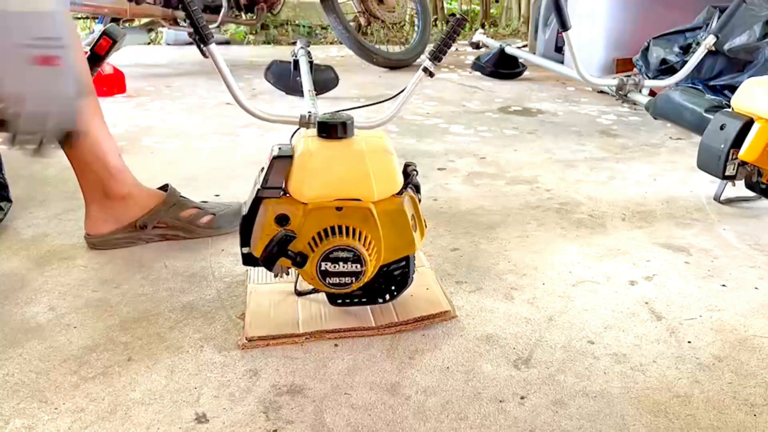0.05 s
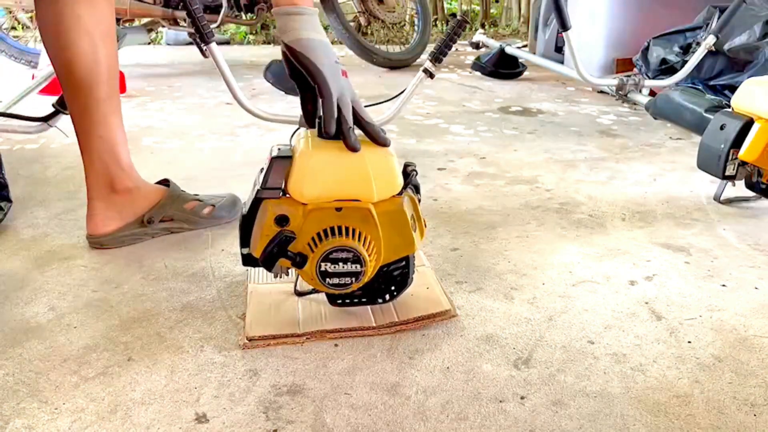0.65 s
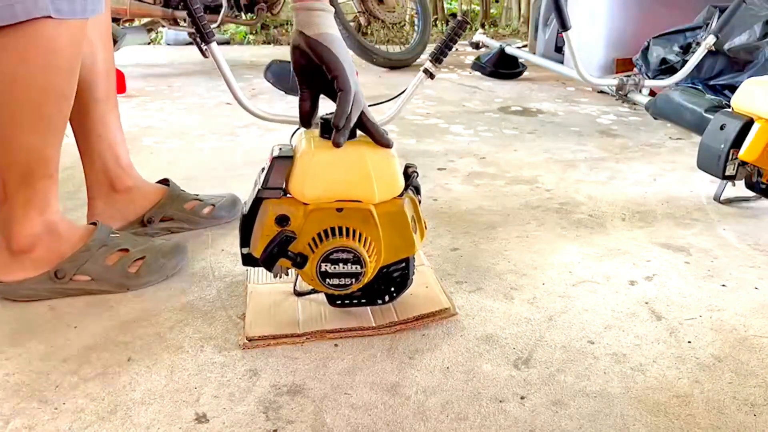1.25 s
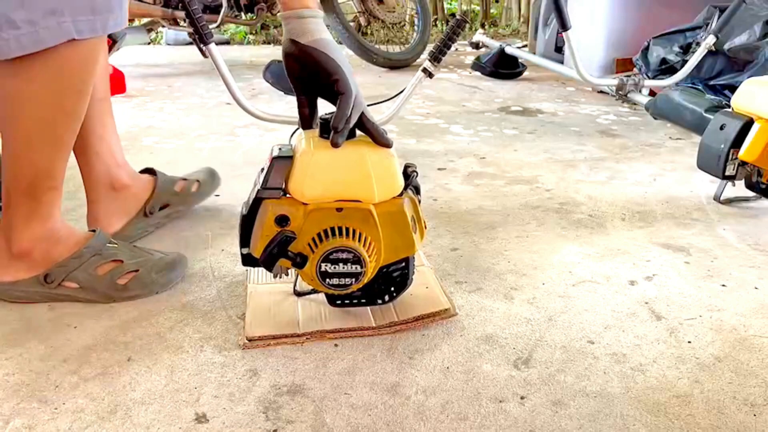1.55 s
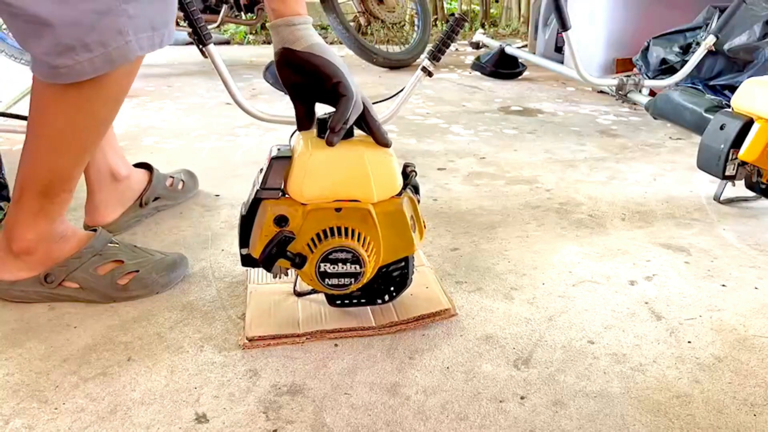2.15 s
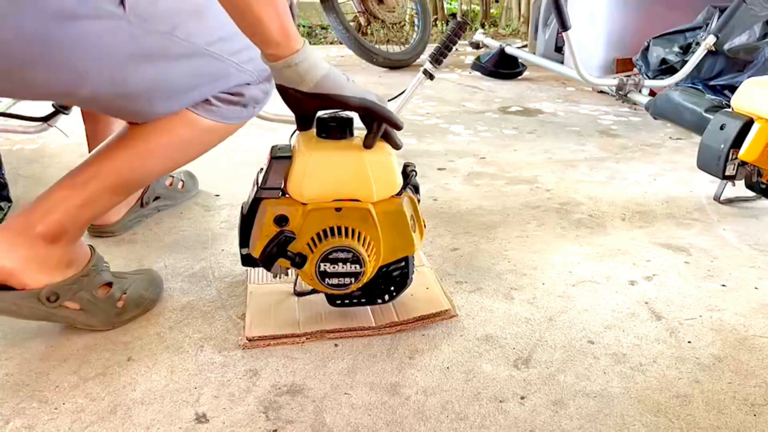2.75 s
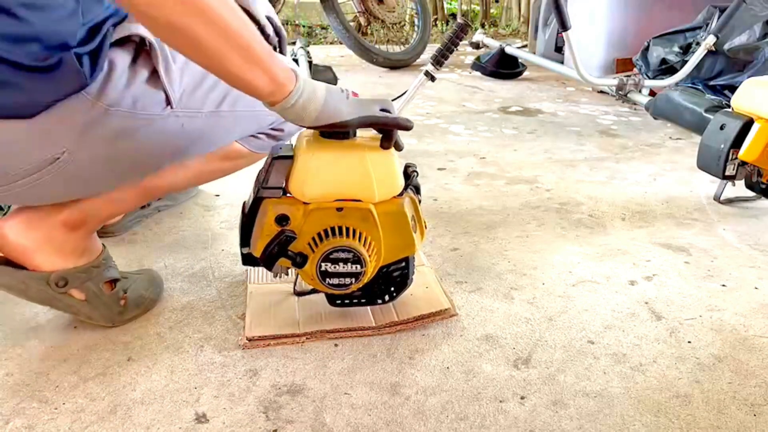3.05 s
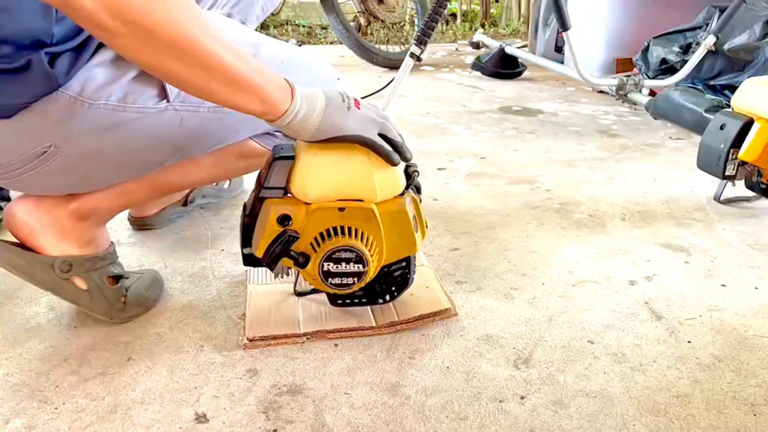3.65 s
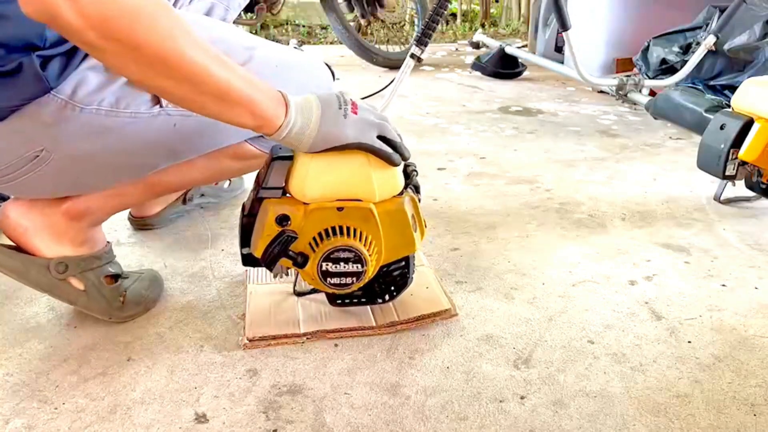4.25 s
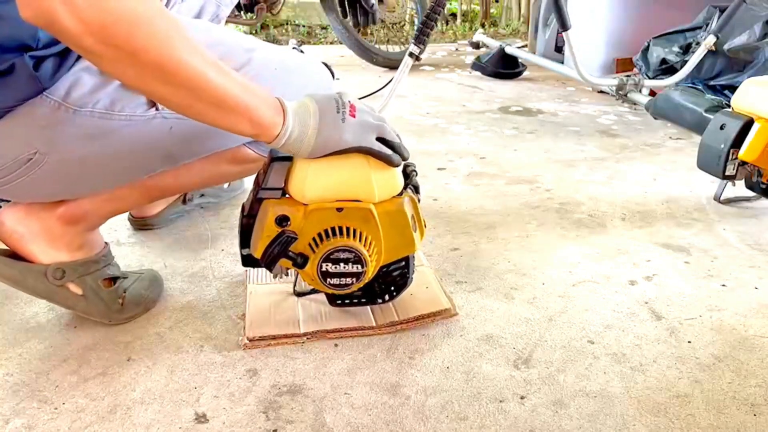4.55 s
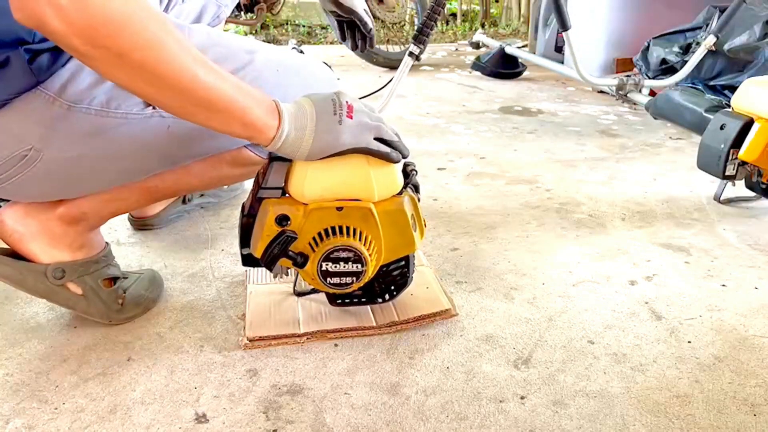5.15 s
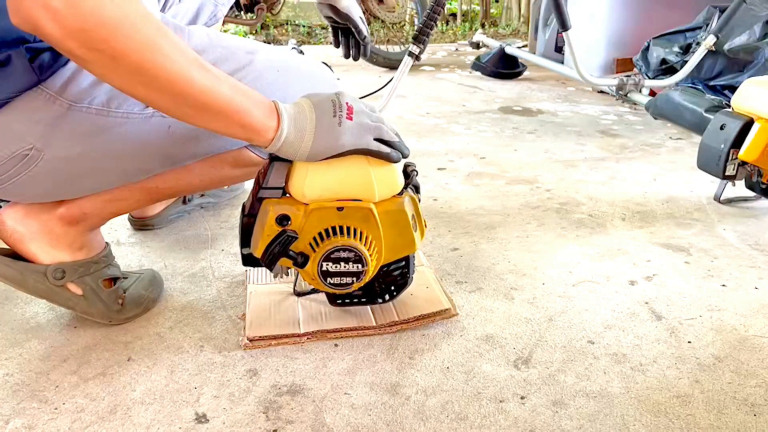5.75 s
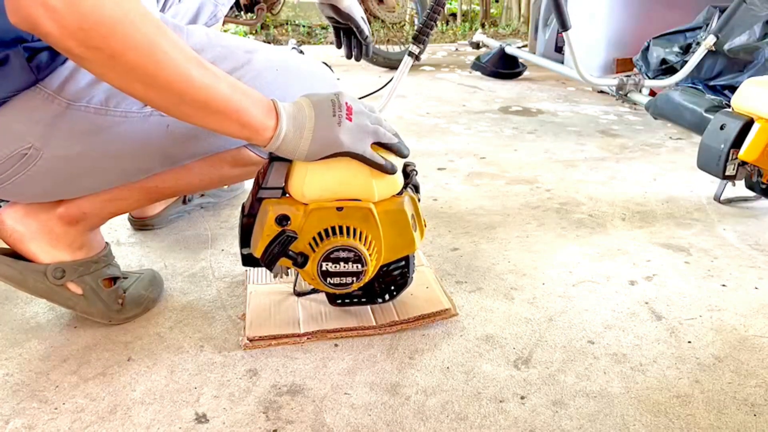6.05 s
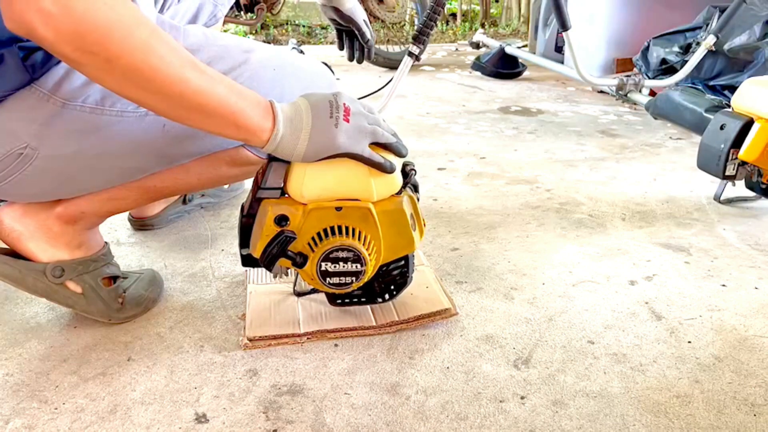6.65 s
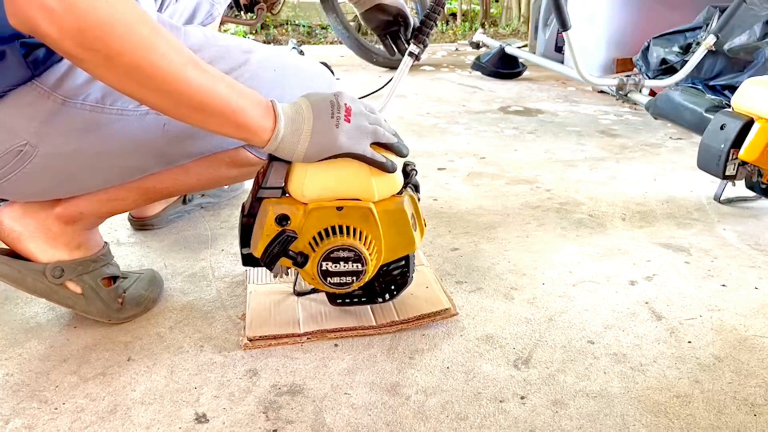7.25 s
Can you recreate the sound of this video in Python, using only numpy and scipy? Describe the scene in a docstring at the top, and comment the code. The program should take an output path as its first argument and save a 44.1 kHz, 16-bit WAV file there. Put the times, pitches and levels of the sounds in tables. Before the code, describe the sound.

A small two-stroke brushcutter engine idles close to the microphone in an open workshop. It pops unevenly, some firings thumping hollowly and others barking sharply, with dull puffs and faint sputters between them. The casing rattles and the muffler pings over a steady fan whirr. About three seconds in, the fuel tank's boxy tone is slightly damped, and the idle carries on at the same pace.

```python
"""An open workshop: a small two-stroke brushcutter idles close by on the concrete floor.
It fires mostly every third or fourth turn, a sharp pop that sweeps down through the muffler and rings
the casing. A slow burn thumps hollowly, a fast one barks, and some make the muffler shell ping.
The turns between give dull puffs and the odd sputter over the whirr of fan and gears; the walls throw
the pops back. Near 3 s a hand presses on the tank, damping its boom and shifting the ping."""
import sys
import numpy as np
from scipy import signal
from scipy.fft import rfft, irfft, next_fast_len
from scipy.io import wavfile
from scipy.ndimage import uniform_filter1d

SR = 44100
rng = np.random.default_rng(int(sys.argv[2]) if len(sys.argv) > 2 else 0)


def unload_audio(sound):
    """Save the sound as a 16-bit wav file, at the path given as the first command line argument."""
    columns = np.transpose(np.atleast_2d(sound))
    # keep every value between -1 and 1, then stretch to whole-number steps
    steps = np.round(np.clip(columns, -1, 1) * 32767)
    wavfile.write(sys.argv[1], SR, steps.astype(np.int16))


N = 326340
TURN_S = .0256  # one turn of the crank

# the clear pops: start_s, thump_db, steepness (0 slow burn, about 1 fast), crack_db, ping_db
FIRINGS = [(0.0319, 2.4, 0.32, 6.0, 6.0), (0.1271, -1.1, 0.64, 3.0, 10.0), (0.1998, 1.0, 0.77, 3.0, 2.0),
           (0.2701, -4.3, 0.07, -24.0, -6.0), (0.2948, -0.8, 0.26, -11.0, -10.0),
           (0.345, 4.4, 0.65, 2.0, 7.0), (0.4178, -0.7, 1.03, 0.0, 0.0), (0.4897, -3.4, 0.27, -20.0, -5.0),
           (0.5151, 4.2, 0.0, 2.0, 12.0), (0.5927, 2.7, 0.63, 1.0, 8.0), (0.6744, 3.2, 0.0, -1.0, 13.0),
           (0.756, 1.3, 0.28, -1.0, -9.0), (0.8368, 3.8, 0.2, -1.0, 13.0), (0.9206, 0.4, 0.92, 2.0, 13.0),
           (1.0169, -2.6, 0.11, -10.0, 0.0), (1.0426, -0.5, 0.32, -9.0, 1.0),
           (1.1234, 2.4, 0.63, 1.0, 10.0), (1.2049, 1.4, 0.8, 2.0, 15.0),
           (1.2817, -4.9, 0.32, -17.0, -14.0), (1.3082, 3.6, 0.23, 4.0, 6.0), (1.411, 3.4, 0.89, 5.0, 10.0),
           (1.5328, -1.0, 0.91, 1.0, 4.0), (1.6327, 0.6, 0.82, 2.0, 1.0), (1.7083, -0.5, 0.25, -6.0, -5.0),
           (1.7338, -3.6, 0.43, -19.0, -7.0), (1.7864, 4.4, 0.11, 2.0, 5.0), (1.8682, 0.9, 0.62, 2.0, 9.0),
           (1.9483, 3.6, 0.0, -1.0, 13.0), (2.0022, -3.4, 0.0, -21.0, -8.0), (2.0271, 1.8, 0.0, -3.0, 4.0),
           (2.1141, 0.1, 0.82, -1.0, 0.0), (2.2138, 2.5, 0.81, 1.0, 12.0), (2.2902, 0.5, 0.91, 6.0, -11.0),
           (2.3893, -0.2, 0.97, 2.0, -11.0), (2.4821, 3.2, 0.67, -1.0, 6.0), (2.554, 0.5, 0.2, -6.0, 6.0),
           (2.578, 3.1, 0.4, -1.0, 2.0), (2.6766, -1.1, 0.8, 3.0, -9.0), (2.7693, 2.0, 0.0, -3.0, 8.0),
           (2.7937, -4.6, 0.36, -18.0, -5.0), (2.871, 2.0, 0.12, -2.0, -4.0),
           (2.9514, 2.7, 0.77, 3.0, -5.0), (3.0505, 1.6, 0.89, 4.0, 8.0), (3.1502, 0.1, 1.01, 2.0, 6.0),
           (3.2259, 3.8, 0.27, 4.0, 2.0), (3.3059, 3.8, 0.5, 3.0, 2.0), (3.407, 3.4, 0.81, 5.0, 3.0),
           (3.4842, 4.9, 0.67, 7.0, -10.0), (3.5607, 0.2, 1.13, 3.0, -6.0), (3.661, 4.0, 0.76, 5.0, 6.0),
           (3.7822, 5.1, 0.37, 5.0, 7.0), (3.9008, 4.1, 0.64, 3.0, 5.0), (3.997, 1.6, 0.78, 3.0, 0.0),
           (4.0727, 2.3, 0.88, 4.0, 6.0), (4.173, 3.3, 0.58, 7.0, -7.0), (4.2704, 4.4, 0.77, 3.0, 0.0),
           (4.3451, -4.9, 0.24, -21.0, -17.0), (4.3716, 2.2, 0.28, 0.0, 5.0), (4.452, 1.2, 0.01, -2.0, 0.0),
           (4.5364, 4.9, 0.13, 2.0, -14.0), (4.6202, 1.6, 0.96, 5.0, -13.0), (4.7025, 1.9, 0.98, 0.0, 6.0),
           (4.7829, -1.0, 1.05, 0.0, 6.0), (4.8811, 1.0, 0.89, 2.0, -8.0), (4.9777, -1.0, 0.94, 5.0, 3.0),
           (5.0731, 5.6, 0.51, 6.0, -6.0), (5.1711, 2.5, 0.68, 3.0, -9.0), (5.2904, 3.7, 0.38, 5.0, -9.0),
           (5.3813, -2.4, 0.0, -20.0, -20.0), (5.4325, 1.1, 0.8, 6.0, 12.0),
           (5.5293, -0.9, 0.82, 0.0, -7.0), (5.609, 2.0, 0.6, 3.0, 8.0), (5.6889, 0.7, 0.97, 3.0, -6.0),
           (5.7655, -5.2, 0.14, -22.0, -1.0), (5.7925, 3.1, 0.72, 2.0, -3.0),
           (5.8889, 1.5, 0.32, -4.0, 7.0), (5.9136, 1.1, 0.2, -5.0, -9.0),
           (5.9887, -2.5, 0.17, -14.0, -2.0), (6.0147, 0.7, 0.24, -1.0, 9.0),
           (6.0932, 2.2, 0.04, -2.0, -14.0), (6.176, 1.1, 0.39, -7.0, -4.0),
           (6.2626, 3.6, 0.13, 0.0, -13.0), (6.3512, 1.8, 0.97, 6.0, -3.0), (6.4357, 1.3, 1.14, 3.0, -13.0),
           (6.5426, 1.2, 0.97, 2.0, 2.0), (6.643, 4.1, 0.18, 6.0, 0.0), (6.7367, 0.1, 0.12, -12.0, 3.0),
           (6.7613, 1.8, 0.76, 4.0, 3.0), (6.8545, 4.4, 0.64, 3.0, -10.0), (6.9247, -0.2, 0.15, -4.0, -1.0),
           (6.9482, -5.0, 0.19, -23.0, -10.0), (6.9725, -0.3, 0.3, -6.0, -6.0),
           (7.0466, 2.2, 0.7, 3.0, -6.0), (7.1421, -0.6, 0.87, 1.0, -8.0), (7.235, 1.7, 1.01, 1.0, 0.0),
           (7.3305, 0.9, 0.72, 2.0, -2.0)]


def gain_of(db):
    """Decibels to gain."""
    return 10 ** (np.asarray(db) / 20)


def unit_rms(x):
    """Scales a sound to rms 1."""
    return x / np.sqrt(np.mean(x ** 2) + 1e-20)


def curve_at(points, hz):
    """Reads a curve on a log-frequency axis."""
    freq_hz, value = np.transpose(points)
    return np.interp(np.log(hz + 1), np.log(freq_hz + 1), value)


def add(mix, start_s, sound):
    """Mixes a sound in at start_s."""
    part = mix[max(round(start_s * SR), 0):][:len(sound)]
    part += sound[:len(part)]


def filtered(x, response):
    """Applies a response, given as a function of frequency."""
    size = next_fast_len(x.shape[-1] + 4096)
    return irfft(rfft(x, size) * response(np.fft.rfftfreq(size, 1 / SR)), size)[..., :x.shape[-1]]


def coloured(x, eq):
    """Equalises a sound with a curve of freq_hz, level_db."""
    return filtered(x, lambda hz: gain_of(curve_at(eq, hz)))


def resonances(x, modes):
    """What a set of resonances gives back when a sound drives it."""
    return filtered(x, lambda hz: sum(gain_of(db) / (1 + 2j * (hz - pitch_hz) / width_hz)
                                      for pitch_hz, width_hz, db in modes))


def spread(pair):
    """Two unrelated signals become a diffuse field, centred in the bass and wide above."""
    # stereo image of the room: freq_hz, left_right_likeness
    likeness = [(60, 0.99), (300, 0.99), (700, 0.19), (1500, 0.45), (4000, 0.39), (15000, 0.23)]
    mid = filtered(pair[0], lambda hz: np.sqrt((1 + curve_at(likeness, hz)) / 2))
    side = filtered(pair[1], lambda hz: np.sqrt((1 - curve_at(likeness, hz)) / 2))
    return np.array([mid + side, mid - side])


def unfired_turns(jitter_s=.00012):
    """Times of the turns between firings: a burn kicks the crank, which slows as it coasts."""
    # coasting crank: port_lag_s, slowing, extra_slowing_after_fast_burn, fast_burn_lead_s
    coast = (.00333, .166, .0376, .00088)
    port_s, slowing, kick, lead_s = coast
    fired = [(row[0], row[2]) for row in FIRINGS]
    fired = [(fired[0][0] - 3 * TURN_S, .5), *fired, (fired[-1][0] + 4 * TURN_S, .5)]
    times = []
    for (start, steep), (end, next_steep) in zip(fired, fired[1:]):
        count = max(round((end - start) / TURN_S), 1)
        share = np.arange(1, count) / count
        coasted = share - (slowing + kick * steep) * share * (1 - share)
        times += list(start + port_s + (end - start) * coasted + lead_s * next_steep * share)
    times = times + jitter_s * rng.standard_normal(len(times))
    return np.array([s for s in times if 0 < s < N / SR])


def burns(turns, wait_s=.062, chance=.15, scatter_db=6.5):
    """The firings plus faint sputters, where the charge half catches after a few unfired turns."""
    # a typical sputter: thump_db, steepness, crack_db, ping_db
    sputter = (-11.5, 0.04, -27, -18)
    fired = np.array(FIRINGS, float)
    last_firing_s = np.append(0, fired[:, 0])[np.searchsorted(fired[:, 0], turns)]
    caught = (turns - last_firing_s > wait_s) & (rng.random(len(turns)) < chance)
    offset_db = scatter_db * rng.standard_normal(len(turns))
    sputters = np.add(sputter, np.outer(offset_db, [1, 0, 1, 1]))
    return np.vstack([fired, np.column_stack([turns, sputters])[caught]]).T


def whirr(turns, level_db=-30, throb=0.014):
    """A bed of fan and gear noise that swells very slightly once a turn."""
    # fan, gears and intake: freq_hz, level_db
    whirr_eq = [(20, -7), (60, -4), (140, 15), (300, 10), (600, -0.5), (1000, -8.5), (1400, -4.5),
                (1900, -8), (2600, -7), (3600, -6.5), (5300, -10.5), (6900, -13), (9900, -24), (12000, -13),
                (15500, -41)]
    every_turn = np.sort([*turns, *(row[0] for row in FIRINGS)])
    crank = np.interp(np.arange(N) / SR, every_turn, np.arange(len(every_turn)))
    air = unit_rms(coloured(spread(rng.standard_normal((2, N))), whirr_eq))
    return gain_of(level_db) * air * (1 + throb * np.cos(2 * np.pi * (crank - .2)))


def muffler(pulse_db, hz, cycles, corner_hz, lag_s=0):
    """Low notes leave the muffler later than high ones, so each pulse sweeps downward."""
    delay_cycles = cycles * np.log(1 + hz / corner_hz) + np.cumsum(lag_s * np.gradient(hz))
    return irfft(gain_of(pulse_db) * np.exp(-2j * np.pi * delay_cycles))


def puffs(turns, burn_times, scatter_db=0.4):
    """A turn with no burn sucks gently back as the exhaust port opens: a soft, dull puff."""
    # exhaust pulse of an unfired turn: freq_hz, level_db
    spectrum = [(35, -12), (46, 22), (58, 23.5), (82, 33), (115, 22.5), (175, 31.5), (290, 23.5), (420, 17),
                (600, 9), (900, -13), (2000, 0), (6000, -55)]
    # its downward sweep: delay_cycles, corner_hz, lead_s
    sweep = (3.8, 107, .007)
    cycles, corner_hz, lead_s = sweep
    out, hz = np.zeros(N), np.fft.rfftfreq(4096, 1 / SR)
    puff = -muffler(curve_at(spectrum, hz), hz, cycles, corner_hz)
    for start, db in zip(turns, scatter_db * rng.standard_normal(len(turns))):
        if start not in burn_times:
            add(out, start - lead_s, gain_of(db) * puff)
    return out


def pops(times, thumps_db, steepness, cracks_db, rasp_share=0.33):
    """Each burn blows out through the muffler: a hollow thump if slow, a bark if fast."""
    # exhaust pulse of a burn: freq_hz, slow_db, fast_db
    spectra = [(35, 10, 8), (56.4, 22, 32.5), (88, 27, 27.5), (157, 26.5, 23.5), (276, 29.5, 30.5),
               (432, 27, 27.5), (560, 21, 20), (617, 25.5, 18), (837, 10, 16), (876, 10.5, 26.5),
               (1134, 0.5, 23), (1414, -16, 11), (1830, 10.5, 18.5), (1984, 0, 11), (2600, -17, -2.5),
               (6000, -24, -36)]
    # its downward sweep: delay_cycles, corner_hz, lead_s
    sweep = (1.41, 27, .0004)
    # the mids take a short cut past the baffles, the bark comes late: freq_hz, extra_delay_s
    baffle_lag = [(480, 0), (540, -.0011), (830, -.0011), (900, 0), (1150, .0002), (1250, .0009),
                  (2500, .0008)]
    # air booming on in the muffler chamber: pitch_hz, width_hz, level_db
    chamber = [(96, 28, 3.5)]
    cycles, corner_hz, lead_s = sweep
    out, hz = np.zeros(N), np.fft.rfftfreq(4096, 1 / SR)
    for start, thump_db, steep, crack_db in zip(times, thumps_db, steepness, cracks_db):
        pulse_db = curve_at([(f, slow + steep * (fast - slow)) for f, slow, fast in spectra], hz)
        force_db = curve_at([(1250, thump_db), (1600, rasp_share * crack_db)], hz)  # top follows the jet
        pop = muffler(pulse_db + force_db, hz, cycles, corner_hz, curve_at(baffle_lag, hz))
        add(out, start - lead_s, pop)
    return out + resonances(out, chamber)


def bursts(times, levels_db, rise_s, fall_s):
    """Short gusts of noise with a quick attack and an exponential decay."""
    t, flow = np.arange(SR // 20) / SR, np.zeros(N)
    envelope = (1 - np.exp(-(t / rise_s) ** 2)) * np.exp(-t / fall_s)
    for start, db in zip(times, levels_db):
        add(flow, start, gain_of(db) * envelope / envelope.max())
    return flow * rng.standard_normal(N)


def crack(times, crack_db, level_db=-29.5, lead_s=0.0001):
    """A turbulent jet of hot gas puts a crack on the front of each pop."""
    # the jet at the outlet: freq_hz, level_db
    jet_eq = [(200, -3), (600, -3.5), (1000, -3), (1450, -2), (1900, -0.5), (2500, -12), (3800, -2),
              (4700, -6), (5400, -11.5), (6500, -9.5), (10000, -11), (12400, -1.5), (13800, -6.5),
              (14800, -13), (16500, -36)]
    jet = bursts(times - lead_s, crack_db, rise_s=0.0012, fall_s=0.0023)
    return gain_of(level_db) * unit_rms(coloured(jet, jet_eq))


def knocks(times, levels_db):
    """Single sharp blows, one sample each."""
    return np.bincount(np.round(np.maximum(times, 0) * SR).astype(int), gain_of(levels_db), N)[:N]


def ringing(force, hz, db, t60_s, spread_radians):
    """One struck metal mode, radiating with its own phase to left and right."""
    t = np.arange(SR // 10) / SR
    phase = 2 * np.pi * rng.random() + spread_radians * rng.standard_normal((2, 1))
    ring = gain_of(db - 60 * t / t60_s) * np.sin(2 * np.pi * hz * t + phase)
    return signal.oaconvolve(force[None], ring, axes=1)[:, :N]


def hand_db():
    """How freely the tank rings under the hand, sample by sample."""
    # the hand presses, then eases a little: time_s, level_db
    damping = [(0, -5.5), (2.5, -6.5), (3.1, -17), (7.4, -12)]
    return np.interp(np.arange(N) / SR, *np.transpose(damping))


def casing(times, crack_db, turns, level_db=-37.5, scatter_db=4, hand_share=0.38, rattles=600):
    """Burns knock the casing, the piston slaps it, loose covers rattle; the hand calms it a little."""
    # crankcase, cylinder fins and covers: pitch_hz, level_db, t60_s
    modes = [(918, -2.5, 0.083), (1120, -1, 0.026), (1677, 1, 0.085), (1853, -2, 0.012), (1996, 3, 0.048),
             (2237, 3.5, 0.031), (2715, -11, 0.024), (2960, -8, 0.097), (3170, 6, 0.027),
             (3420, 3.5, 0.025), (3600, 5.5, 0.02), (4700, -9.5, 0.034), (6160, 0, 0.012)]
    knock_db = -5 + 0.71 * crack_db
    slap_db = np.full(len(turns), -5)
    rattle_db = np.full(rattles, -11)
    hits_db = np.concatenate([knock_db, slap_db, rattle_db])
    out = np.zeros((2, N))
    for mode in modes:
        hits_s = np.concatenate([times, turns, rng.uniform(0, N / SR, rattles)])
        force = knocks(hits_s, hits_db + scatter_db * rng.uniform(-1, 1, len(hits_s)))
        out += ringing(force, *mode, spread_radians=0.84)
    return gain_of(level_db) * unit_rms(out * gain_of(hand_share * hand_db()))


def clink(times, crack_db, ping_db, turns, level_db=-39, chatter_db=-28, tick_db=-10, delay_s=0.001394):
    """Each pressure front strikes the muffler shell, which chatters on its bolts and ticks between."""
    # thin metal shell of the muffler: pitch_hz, level_db, t60_s
    modes = [(3489, 0.5, .035), (3544, 1.5, .04), (3764, 1, 0.037), (4080, -4, 0.013), (4380, -4, 0.014)]
    blow_db = 0.91 * crack_db + 0.11 * ping_db
    blows = knocks(times + delay_s, blow_db)
    chatter = bursts(times, blow_db + chatter_db, rise_s=0.0017, fall_s=0.005)
    ticks = knocks(turns, tick_db + rng.uniform(-3, 3, len(turns)))
    shell = sum(ringing(blows + chatter + ticks, *mode, spread_radians=0.41) for mode in modes)
    return gain_of(level_db) * unit_rms(shell)


def ping(times, ping_db, level_db=-41, t60_s=0.054, rise_s=0.0022, scatter_hz=8):
    """One mode of the muffler shell rings out clearly after some pops."""
    # the note of the shell, rising as the hand presses: time_s, pitch_hz
    pitch_curve = [(0, 3920), (.85, 3888), (1.2, 3915), (2.9, 3912), (3.6, 3965), (5.6, 3992), (6, 3925),
                   (7.4, 3950)]
    t, out = np.arange(SR // 8) / SR, np.zeros(N)
    for start, db, (detune, phase) in zip(times, ping_db, rng.standard_normal((len(times), 2))):
        hz = np.interp(start, *np.transpose(pitch_curve)) + scatter_hz * detune
        envelope = gain_of(db - 60 * t / t60_s) * (1 - np.exp(-t / rise_s))
        add(out, start, envelope * np.sin(2 * np.pi * (hz * t + phase)))
    return gain_of(level_db) * unit_rms(out)


def tank(shake):
    """The plastic fuel tank, shaken by the exhaust, adds boxy tones that the hand damps."""
    # tank resonances: pitch_hz, width_hz, level_db
    modes = [(414.6, 8, 5.5), (636, 76, 3.5), (1915, 41, 8)]
    return resonances(shake, modes) * gain_of(hand_db())


def diffuse_tail(build_s=0.0011):
    """The room's reverb: a noise tail that dies sooner in the treble."""
    # decay of the room: freq_hz, t60_s
    decay_times = [(100, 0.62), (500, 0.26), (2000, 0.25), (6000, 0.2), (14000, 0.13)]
    # tone of the tail: freq_hz, level_db
    tail_eq = [(60, -3), (300, -3), (900, 1), (3500, 7.5), (7000, 4.5), (13000, 1.5)]
    hz, t, noise = signal.stft(spread(rng.standard_normal((2, SR // 2))), SR, nperseg=256)
    envelope = gain_of(-60 * t / curve_at(decay_times, hz)[:, None]) * (1 - np.exp(-(t / build_s) ** 2))
    tail = signal.istft(noise * envelope, SR)[1]
    return coloured(tail / np.linalg.norm(tail[0]), tail_eq)


def workshop(x, tail_db=-11, tails=5):
    """Distinct reflections, then a short, smooth reverb tail, picked at random for each pop."""
    # nearby walls and roof: delay_s, gain
    echoes = [(0.0126, -0.16), (0.036, 0.039)]
    early, late = np.zeros(N), np.zeros((2, N))
    for delay_s, gain in echoes:
        add(early, delay_s, gain * x)
    early = coloured(early, [(600, 1.0), (3000, -8), (12000, -17)])  # cluttered walls scatter the treble
    switch_s = [row[0] - TURN_S / 10 for row in FIRINGS]  # just before each firing
    picks = rng.integers(0, tails, len(FIRINGS) + 1)
    active_tail = picks[np.searchsorted(switch_s, np.arange(N) / SR)]
    for k in range(tails):
        send = uniform_filter1d(1. * (active_tail == k), size=128)
        late += signal.oaconvolve((x * send)[None], diffuse_tail(), axes=1)[:, :N]
    return early + gain_of(tail_db) * late


def standing_waves(exhaust):
    """The exhaust sets the air humming between floor and roof."""
    # room modes: pitch_hz, width_hz, level_db
    modes = [(147.7, 19, -4.5), (215, 24, -14.5), (259, 8.4, -13.5), (332.5, 12, -8), (766, 11, -2.5)]
    return resonances(exhaust, modes)


def microphone_ports(x):
    """Direct sound reaches the two microphone ports slightly apart."""
    # arrival gap: freq_hz, left_lag_s
    lag = [(300, -.00002), (1000, -.00006), (1400, -.00006), (1850, -.000015), (3300, -.00005),
           (5000, -.000006), (7000, .00003), (8200, .00006), (10500, .00008), (15000, .000096)]
    return filtered(x, lambda hz: np.exp(-2j * np.pi * np.outer([1, 0], hz * curve_at(lag, hz))))


def scene(metal_send_db=-6):
    """Exhaust, ringing metal, tank and room over the whirr of the fan."""
    turns = unfired_turns()
    times, thump_db, steepness, crack_db, ping_db = burns(turns)
    exhaust = puffs(turns, times) + pops(times, thump_db, steepness, crack_db) + crack(times, crack_db)
    metal = casing(times, crack_db, turns) + clink(times, crack_db, ping_db, turns) + ping(times, ping_db)
    room = workshop(exhaust + gain_of(metal_send_db) * metal.mean(0)) + standing_waves(exhaust)
    return microphone_ports(exhaust + metal) + tank(exhaust) + room + whirr(turns)


def record(dry, ceiling=.95, knee=.55, cutoff_hz=16000):
    """Microphone colour, soft overload on the hardest pops, then a low-pass."""
    # notch of the sound port: freq_hz, level_db
    notch = [(6900, 0.5), (7600, -4), (8350, -13.5), (9100, -2), (9900, -1)]
    # balance of the two ports: freq_hz, left_minus_right_db
    balance = [(200, 0), (400, -.3), (700, 1), (1300, -.5), (2400, .8), (4400, 2.3), (8000, .5), (12000, 0)]
    x = filtered(dry, lambda hz: gain_of(curve_at(notch, hz)
                                         + np.outer([.5, -.5], curve_at(balance, hz))))
    headroom = ceiling - knee
    over = np.maximum(abs(x) - knee, 0)
    x = x + np.sign(x) * (headroom * np.tanh(over / headroom) - over)
    lowpass = signal.firwin(255, cutoff_hz, window=("kaiser", 9), fs=SR)
    return signal.oaconvolve(x, lowpass[None], "same")


dry = scene()
out = record(dry)
unload_audio(out)
```